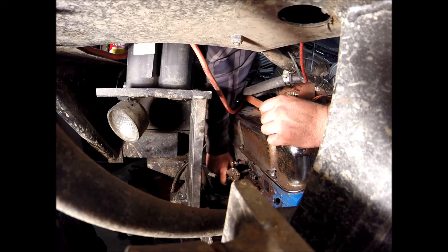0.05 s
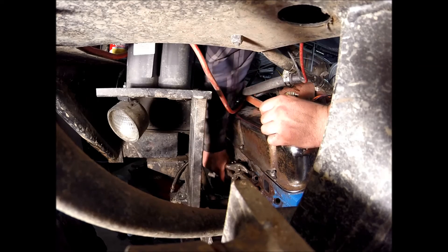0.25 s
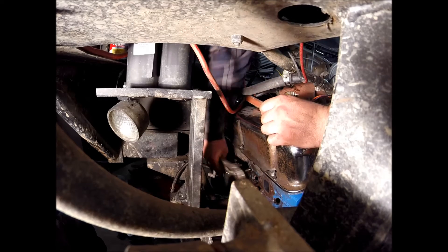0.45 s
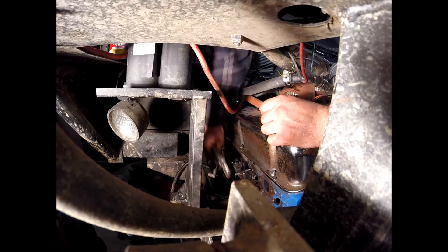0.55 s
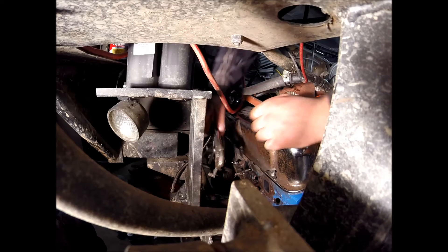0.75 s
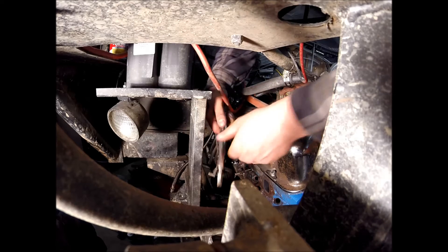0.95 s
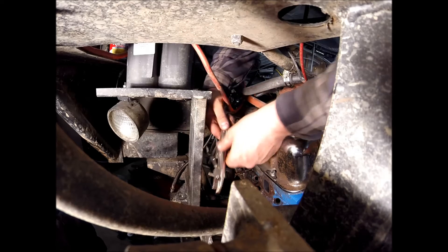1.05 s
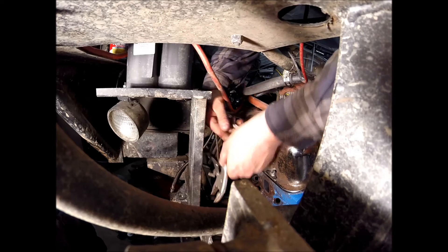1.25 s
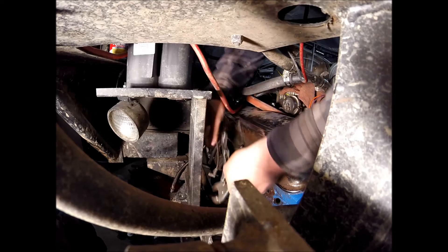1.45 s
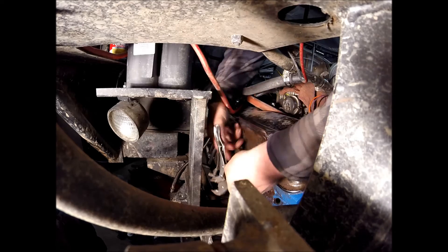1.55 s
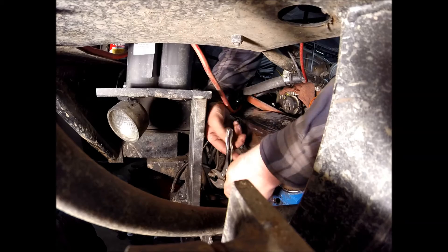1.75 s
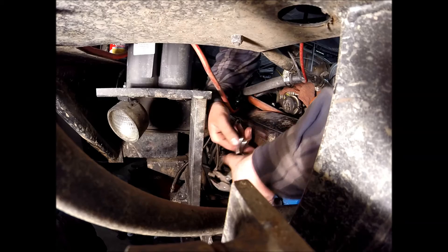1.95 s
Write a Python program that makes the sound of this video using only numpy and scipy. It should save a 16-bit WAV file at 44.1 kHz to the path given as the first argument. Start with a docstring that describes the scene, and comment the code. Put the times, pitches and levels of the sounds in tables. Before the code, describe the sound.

Sharp crack and steel clang of a stuck bolt breaking, followed by light spanner clinks.

```python
"""A stuck bolt snaps

A seized bolt snaps under a spanner in an engine bay: a crack, then the tool slams twice into the steel
frame. Each blow makes the steel ring, the chassis thud and the workshop echo. A hand and the tool slide
faintly over metal, then two spanners clink together as they are taken off. A machine hums behind it all.
Ringing is made of fading pure tones; rattles, echoes and rubbing are made of shaped noise."""
import sys
import numpy as np
from scipy import signal
from scipy.fft import rfft, irfft
from scipy.io import wavfile
from scipy.ndimage import uniform_filter1d

SR = 44100
rng = np.random.default_rng(int(sys.argv[2]) if len(sys.argv) > 2 else 0)


def persist_wave(psi):
    """Save psi, clipped to +-1, as 16-bit WAV."""
    counts = np.round(np.clip(psi, -1, 1) * 32767).astype(np.int16)
    wavfile.write(sys.argv[1], SR, np.atleast_2d(counts).T)


N = 88200
T = np.arange(N) / SR
FREQS_HZ = np.maximum(np.fft.rfftfreq(N, 1 / SR), 1)

# the snap and the knocks of the tool on the frame
# (time [s], level [dB], brightness [dB per octave], scrape length [s], boosted pitch [Hz], boost [dB])
BOLT_BLOWS = [(0.2428, -12, 1, 0.0012, 6860, 13), (0.2469, -5, 1, .002, 2900, 5.5),
              (0.2601, -4.5, -2.5, .002, 2760, 6), (0.2633, 1, 2.5, 0.0036, 6770, 5),
              (.2864, -6, -2, .003, 4200, 11), (0.3166, -21, 2, 0.0034, 6750, 4.5),
              (0.4364, -30.5, -4.5, 0.0013, 2630, 11), (0.5457, -41, -5, 0.0015, 7070, 5),
              (0.8746, -48, -7.5, 0.0029, 4040, 14), (.917, -49, -4, .003, 3700, 8.5)]
# ringing tones of frame and bolt (pitch [Hz], level [dB], time to fade by 60 dB [s])
FRAME_TONES = [(2200, -11, .15), (2742, -3, .28), (2785, -7, .25), (3360, -8, .2), (4048, -6, .2),
               (4168, 0, .24), (4790, -2, .3), (5477, -3, .3), (6145, -3, .33), (6385, -1, .28),
               (6630, -3, .22), (6904, -1, .27), (7238, -1, .25)]
# short, dense rattle of the steel (frequency [Hz], level [dB])
CRACK_SPECTRUM = [(300, -23.5), (520, -14.5), (950, -6.5), (1650, -24), (2100, -9), (2400, -6.5),
                  (2800, -2), (3600, -3.5), (4200, -3.5), (4500, -4), (5000, 0.5), (7100, -6.5),
                  (8300, -11), (15000, -17)]
# thud of the chassis (frequency [Hz], level [dB])
THUD_SPECTRUM = [(30, -20), (75, -7), (160, -14), (300, -11.5), (410, -13.5), (520, 1.5), (950, -8),
                 (1500, -1.5), (3000, -34)]
# low tones of the chassis (pitch [Hz], level [dB], time to fade by 60 dB [s])
CHASSIS_TONES = [(502, -1, .3), (548, -7, .45), (721, 1, .1), (922, 1, .14), (960, 3, .15)]
# the spanners touching
# (time [s], level [dB], brightness [dB per octave], ring level [dB], boosted pitch [Hz])
SPANNER_CLINKS = [(1.506, -8.5, -2, -21.5, 6430), (1.5202, -13.5, -1, -18, 2300),
                  (1.544, -12, 3.5, -17, 6300), (1.5572, -13, -7, -6.5, 4100), (1.566, -11.5, 3, -25, 6500),
                  (1.6037, -2, 3.5, -14.5, 4630), (1.606, -11.5, 6.5, 7, 10220),
                  (1.6218, -19, 6, -21, 4000), (1.7037, -17.5, -9, -14, 7700),
                  (1.7118, -13, -3.5, -15, 2300), (1.745, -12, -0.5, -22, 6750),
                  (1.758, -13.5, -2.5, -9.5, 4370), (1.7682, -14, -7, -22, 6950),
                  (1.8035, -5.5, 0, -2, 14200), (1.8458, -19, -13.5, 4, 4770),
                  (1.881, -10.5, -7.5, -4.5, 11200), (1.8924, -11.5, 7, -3, 4540)]
# ringing tones of the spanners (pitch [Hz], level [dB], time to fade by 60 dB [s])
SPANNER_TONES = [(2260, -1, .12), (2720, -3, .09), (4260, 1, .11), (4750, -3, .14), (6100, -4, .09),
                 (7262, -8, .08), (7820, -9, .2), (10715, -1, .1), (14290, -1, .075)]
# click of steel on steel (frequency [Hz], level [dB])
CLICK_SPECTRUM = [(1000, -44.5), (1950, -20), (2300, -3), (2850, -2), (3150, -9.5), (4250, 3.5),
                  (5600, -2.5), (6700, 0), (8600, -5), (9300, -11), (10100, -9.5), (11500, -18.5),
                  (15000, -23)]
# slides over metal (middle time [s], half length [s], level [dB], boosted pitch [Hz])
SLIDES = [(0.96, .08, -67, 6770), (1.392, 0.031, -62.5, 4330)]
# hiss of sliding (frequency [Hz], level [dB])
SLIDE_SPECTRUM = [(1000, -8), (1600, 2.5), (3000, 0.5), (8000, -6.5), (15000, -25)]
# echo of the workshop (frequency [Hz], level [dB], time to fade by 60 dB [s])
ECHO_SPECTRUM = [(199.5, -15, 0.99), (380, -4, 1), (500, 4, .8), (900, -5.5, 0.45), (1650, -16, .7),
                 (2425, -5, 0.61), (3900, -6.5, 0.85), (7050, -5.5, .58), (8800, -10.5, .42),
                 (14970, -18.5, .3)]
# dull rush of the machine (frequency [Hz], level [dB])
MACHINE_SPECTRUM = [(20, -10.5), (55, -1), (90, -6.5), (150, -1), (250, -4.5), (340, -5.5), (520, -3),
                    (850, -5), (1100, -14.5), (1600, -22.5), (2200, -22), (2750, -21.5), (3300, -27),
                    (7000, -35), (15000, -48.5)]
# hum of the machine (pitch [Hz], level [dB])
HUM_TONES = [(119.9, -54.5), (168.8, -59.5), (287, -65.5), (401, -60), (807, -64.5)]


def bolt_blows(crack_fade_s=.042, thud_fade_s=.15):
    """Each blow scrapes briefly, rattles and rings the steel, thuds in the chassis and fills the room."""
    out = np.zeros(N)
    steel, chassis, echo = tick(CRACK_SPECTRUM), tick(THUD_SPECTRUM), workshop_echo()
    bite = 1 + gain(13.5) * fade(.06)  # the ring starts with extra strength and quickly loses it
    for start, db, brightness, scrape_s, boosted_hz, boost_db in BOLT_BLOWS:
        scrape = np.where(T < scrape_s, gain(2.5), 0)
        crack = gain(-12.5) * rattle(steel, scrape + delay(fade(crack_fade_s), scrape_s))
        frame = gain(-38) * bite * ring(FRAME_TONES)
        clang = delay(crack + frame + gain(-32.5) * echo, start)
        thud = gain(-41) * rattle(chassis, fade(thud_fade_s)) + gain(-32.5) * ring(CHASSIS_TONES)
        out += gain(db) * (shape_tone(clang, brightness, boosted_hz, boost_db) + delay(thud, start))
    return out


def dull_tap():
    """One soft, fading tone just after the snap."""
    return delay(ring([(1280, -47, .16)]), start_s=.472)


def spanner_clinks(click_fade_s=.036, other_tones_db=-17):
    """Each touch clicks, scatters around the bay and rings the tones that suit the spot it hits."""
    out, contact, echo = np.zeros(N), tick(CLICK_SPECTRUM), workshop_echo()
    for start, db, brightness, ring_db, boosted_hz in SPANNER_CLINKS:
        scatter = gain(-31.5) * rattle(contact, fade(click_fade_s))
        click = delay(gain(-14) * contact + scatter + gain(-55) * echo, start)
        tones = [(hz, tone_db + other_tones_db * (1 - closeness(hz, boosted_hz)), fade_s)
                 for hz, tone_db, fade_s in SPANNER_TONES]
        ringing = gain(ring_db - 30.5) * delay(ring(tones), start)
        out += gain(db) * (shape_tone(click, brightness, boosted_hz, boost_db=8) + ringing)
    return out


def sliding_grip(uneven_db=3):
    """The tool and a hand rub faintly over metal with uneven pressure."""
    out = np.zeros(N)
    for middle, half_s, db, boosted_hz in SLIDES:
        pressure = np.exp(-((T - middle) / half_s) ** 2) * gain(db + uneven_db * wander(90))
        out += pressure * shape_tone(noise(SLIDE_SPECTRUM), 0, boosted_hz, boost_db=6.5)
    return out


def workshop_echo(build_s=.0027):
    """Reflections blur into noise. Each octave fades at its own speed, the highest fastest."""
    spectrum, fade_s = rfft(noise(ECHO_SPECTRUM)), curve(ECHO_SPECTRUM, column=2)
    low_hz, high_hz = ECHO_SPECTRUM[0][0], ECHO_SPECTRUM[-1][0]
    octave = np.log2(np.clip(FREQS_HZ, low_hz, high_hz) / low_hz)
    tail = np.zeros(N)
    for k in range(int(np.ceil(octave.max())) + 1):
        band = np.maximum(1 - np.abs(octave - k), 0)
        tail += irfft(spectrum * band, N) * fade(np.average(fade_s, weights=band))
    return tail * (1 - np.exp(-T / build_s))


def machine(drift_hz=1.2, waver_db=2):
    """A running machine gives a steady, dull rush and a wavering hum."""
    out = gain(-48) * noise(MACHINE_SPECTRUM)
    for hz, db in HUM_TONES:
        cycles = np.cumsum(hz + drift_hz * wander(2.9)) / SR
        out += np.sqrt(2) * gain(db + waver_db * wander(8.9)) * np.sin(2 * np.pi * cycles)
    return out


def ring(tones):
    """A struck object rings with pure tones that each die away."""
    t = T[:N // 2]
    x = sum(gain(db) * np.exp(-np.log(1000) * t / fade_s) * np.sin(2 * np.pi * (hz * t + rng.random()))
            for hz, db, fade_s in tones)
    return np.pad(x, (0, N - len(t)))


def tick(table):
    """The first instant of a hit: one sharp pulse with the table's spectrum and an energy of 1."""
    cepstrum = irfft(np.log(gain(curve(table))), N)
    cepstrum[1:N // 2] *= 2  # folding the second half onto the first packs the sound at the start
    cepstrum[N // 2:] = 0
    x = irfft(np.exp(rfft(cepstrum)), N)
    return x / np.linalg.norm(x)


def rattle(pulse, loudness, smooth_hz=350):
    """Many tightly packed reflections of a pulse, following a loudness curve."""
    spectrum = rfft(rng.standard_normal(N) * loudness)
    power = uniform_filter1d(np.abs(spectrum) ** 2, int(smooth_hz * N / SR))
    spectrum /= np.sqrt(power)  # even out chance peaks and dips
    return irfft(spectrum * rfft(pulse), N) * np.linalg.norm(loudness) * (T < T[-1] / 2)


def closeness(hz, boosted_hz, width_octaves=.27):
    """The spot that is hit drives one pitch best: 1 at that pitch, near 0 far from it."""
    return 1 / (1 + (2 * np.log2(hz / boosted_hz) / width_octaves) ** 2)


def shape_tone(x, brightness, boosted_hz, boost_db, pivot_hz=5000):
    """Make a sound brighter or duller, and boost it around one pitch."""
    octaves = np.clip(np.log2(FREQS_HZ / pivot_hz), -1.5, 1.5)
    return irfft(rfft(x) * gain(brightness * octaves + boost_db * closeness(FREQS_HZ, boosted_hz)), N)


def noise(table):
    """Noise with the table's spectrum and a typical size of 1."""
    x = irfft(rfft(rng.standard_normal(N)) * gain(curve(table)), N)
    return x / x.std()


def wander(rate_hz):
    """A smooth random wobble with a typical size of 1."""
    x = irfft(rfft(rng.standard_normal(N)) * np.exp(-(FREQS_HZ / rate_hz) ** 2) * (FREQS_HZ > 1), N)
    return x / x.std()


def curve(table, column=1):
    """Join a table's points to get a value at every frequency."""
    rows = np.array(table, float)
    return np.interp(np.log(FREQS_HZ), np.log(rows[:, 0]), rows[:, column])


def fade(fade_s):
    """Start at 1 and fall by 60 dB in the given time."""
    return np.exp(-np.log(1000) * T / fade_s)


def delay(x, start_s):
    """Move a sound to its start time."""
    return np.concatenate([np.zeros(int(start_s * SR)), x])[:N]


def gain(db):
    """Turn decibels into a multiplier."""
    return 10 ** (np.asarray(db) / 20)


def scene():
    """Add all the sounds into one channel."""
    return (dull_tap() + bolt_blows() + spanner_clinks() + sliding_grip() + machine())[None]


def record(dry):
    """Round off the loudest peaks and cut the very highest treble."""
    ceiling, top_hz = .9, 15150
    rounded = ceiling * np.tanh(dry / ceiling)
    return signal.sosfilt(signal.ellip(8, .2, 80, top_hz, fs=SR, output="sos"), rounded)


dry = scene()
out = record(dry)
persist_wave(out)
```